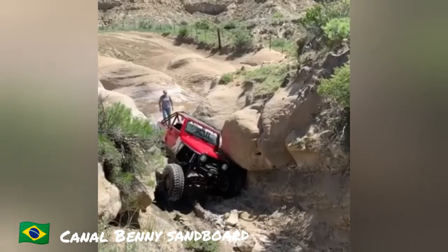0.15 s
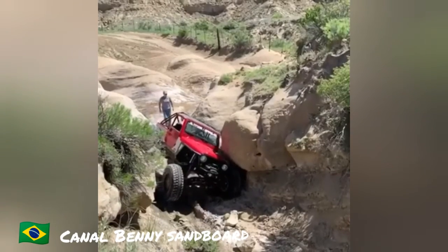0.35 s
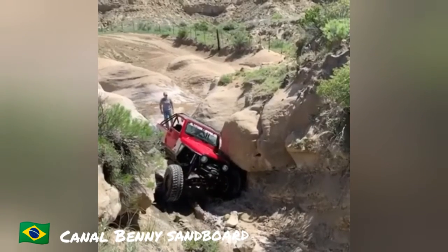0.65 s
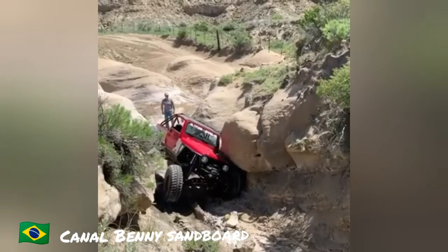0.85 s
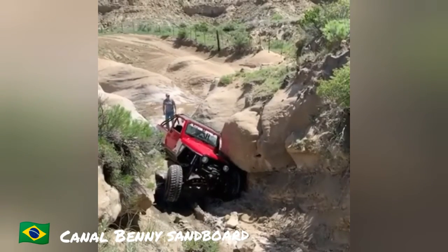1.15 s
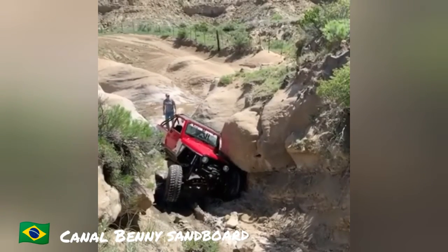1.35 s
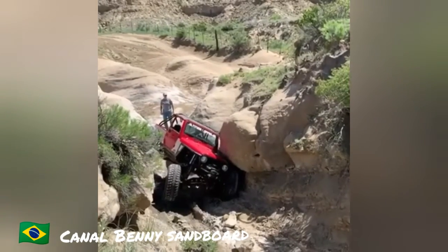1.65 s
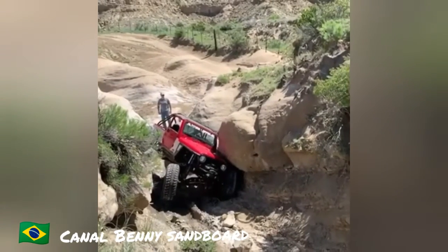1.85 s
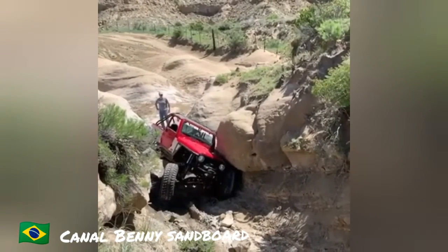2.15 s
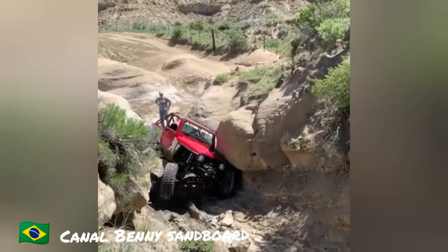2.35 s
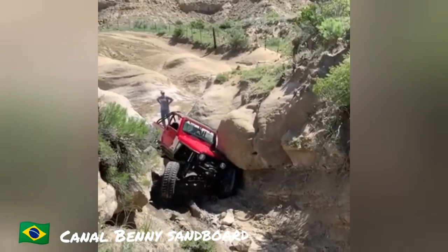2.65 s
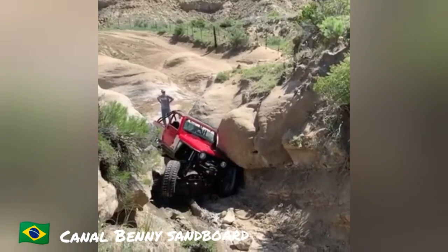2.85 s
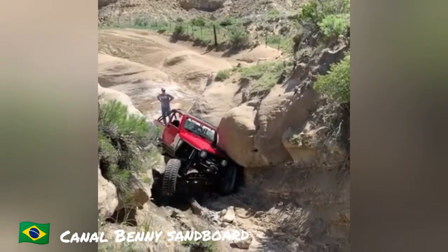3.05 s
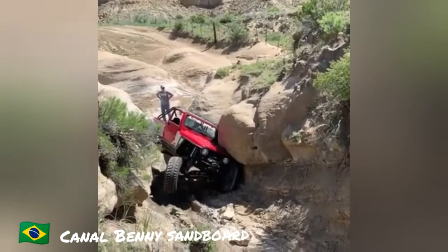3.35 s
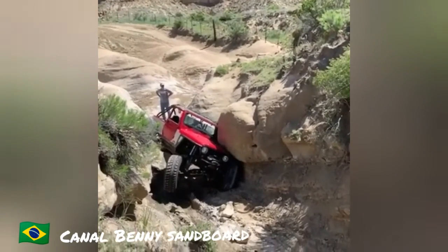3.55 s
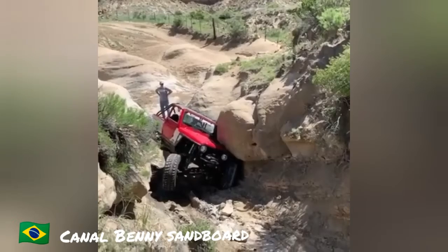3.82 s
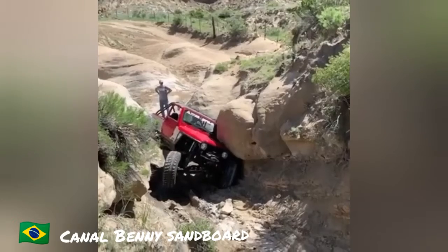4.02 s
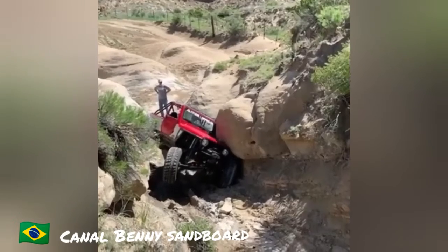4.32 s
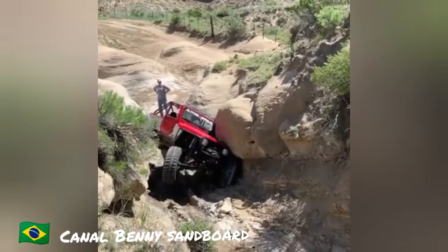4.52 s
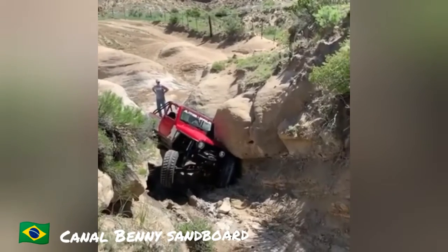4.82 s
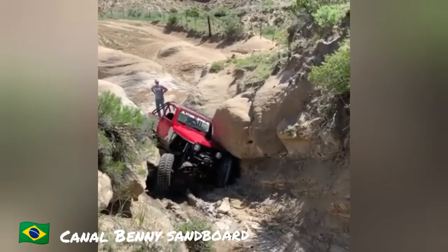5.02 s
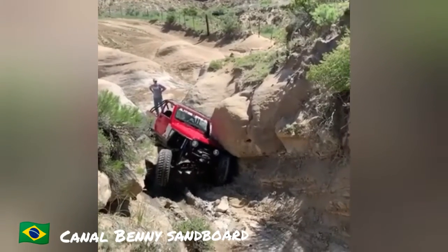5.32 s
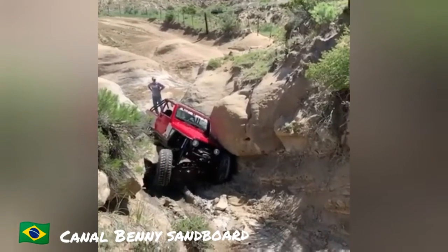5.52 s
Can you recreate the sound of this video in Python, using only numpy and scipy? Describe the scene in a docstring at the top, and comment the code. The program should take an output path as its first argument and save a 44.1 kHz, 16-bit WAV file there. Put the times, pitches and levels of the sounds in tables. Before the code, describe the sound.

A six-cylinder off-road vehicle works over a rock ledge outdoors, heard in mono from some metres away, dry and slightly band-limited. At 0 s the engine is already slowing, its exhaust a soft lumpy burble beneath mechanical rush and fan hiss. Short gritty tyre scuffs come at about 0.35-0.4 s and again at 0.5 s. The revs sag to their lowest near 1.2 s, then climb from 1.4 s into a fuller growl, holding a moderate pull around 2.5-3.5 s, with a quick scuff at 2.66 s. From 3.5 s the throttle opens wide and a loud, dense roar holds until about 4.6 s, with a faint whirr and drone. Then the foot lifts: the low exhaust swells, irregular pops run from 4.86 to 5.2 s, and deep body thumps land near 4.9 and 5.17 s. The pitch falls unsteadily, and a loose metal part ticks rapidly from 5.4 s until the end at roughly 5.7 s.

```python
"""A six-cylinder off-road engine on a rock ledge in the open air, heard from some metres away.
It sags towards idle while tyres scuff the rock, then pulls hard, with more scuffs, up to its top speed.
As the foot lifts, the exhaust swells and pops, the body thumps twice on its springs and a loose part rattles.
The exhaust sums multiples of one cylinder bank's firing rate over a growl of weaker multiples of the cycle;
shaped noise makes the engine bay, fan, scuffs and rattle, and decaying or bell-shaped levels place the events."""
import sys
import numpy as np
from scipy import signal
from scipy.fft import rfft, irfft, next_fast_len
from scipy.io import wavfile
from scipy.ndimage import uniform_filter1d, map_coordinates

SR = 44100
rng = np.random.default_rng(int(sys.argv[2]) if len(sys.argv) > 2 else 0)


def bounce(signal):
    """Save signal as a 16-bit WAV file at the path given by the first command-line argument."""
    frames = np.transpose(np.atleast_2d(signal))
    limited = np.clip(frames, -1, 1)
    pcm = np.round(limited * 32767).astype(np.int16)
    wavfile.write(sys.argv[1], SR, pcm)


N = 250399

TOP_RATE_HZ = 62  # bank rate to which the speed laws refer
FIRST_BLOW_TURNS = .45  # place of the blow within a bank turn (one period of the bank rate)


def amp(db):
    """Gain of a level in dB."""
    return 10 ** (np.asarray(db) / 20)


def unit(x):
    """x at rms 1."""
    return x / np.sqrt(np.mean(x ** 2) + 1e-20)


def along(points, hz):
    """Value at hz between (Hz, value) points on a log axis."""
    f, v = np.transpose(points)
    return np.interp(np.log(hz + 1), np.log(f + 1), v)


def curves(rows):
    """One value per sample for each column after the time."""
    s, *cols = np.transpose(rows)
    return [np.interp(np.arange(N) / SR, s, c) for c in cols]


def wobble(rate, step=1):
    """A smooth random curve, rate knots a second, one value every step samples."""
    knots = rng.standard_normal(int(N * rate / SR) + 4)
    return map_coordinates(knots, [np.arange(0, N, step) * rate / SR])


def filtered(x, response):
    """x times a response of frequency."""
    m = next_fast_len(len(x) + 8192)
    return irfft(rfft(x, m) * response(np.fft.rfftfreq(m, 1 / SR)), m)[:len(x)]


def patchy(depth_db):
    """Noise with patches of random gain in time and frequency."""
    z = signal.stft(rng.standard_normal(N), nperseg=512)[2]
    field = uniform_filter1d(rng.standard_normal(z.shape), size=5, axis=0)
    field = uniform_filter1d(field, size=8, axis=1)
    return signal.istft(z * amp(depth_db * unit(field)), nperseg=512)[1][:N]


def swell(s, length):
    """A bell-shaped rise and fall around s."""
    return np.exp(-.5 * ((np.arange(N) / SR - s) / (length / 2)) ** 2)


def humps(modes):
    """Gain of (Hz, width Hz, dB) resonances over a flat response."""
    return lambda hz: 1 + sum((amp(db) - 1) / (1 + ((hz - c) / (w / 2)) ** 2) for c, w, db in modes)


def ring(modes):
    """Response of (Hz, width Hz, dB) resonances that ring after a blow, with alternating sign."""
    return lambda f: sum((-1) ** k * amp(db) * 1j * f * w / (c * c - f * f + 1j * f * w)
                         for k, (c, w, db) in enumerate(modes))


def narrow(hz, width_hz, wander_hz):
    """Noise ringing in one resonance whose pitch wanders."""
    a, b = (filtered(rng.standard_normal(N), lambda f: 1 / (1 + (f / (width_hz / 2)) ** 2))
            for _ in range(2))
    phase = 2 * np.pi * np.cumsum(hz + wander_hz * wobble(7)) / SR
    return unit(a * np.cos(phase) + b * np.sin(phase))


def follows(law, bank_hz, throttle_db):
    """A level in dB that follows speed and throttle."""
    top_db, per_octave_db, share = law
    return top_db + per_octave_db * np.log2(bank_hz / TOP_RATE_HZ) + share * throttle_db


def engine_bay(turns, rush_db, hiss_db):
    """Mechanical rush throbbing with each firing and ringing in panels, fan hiss, a whirr and a pulsing drone."""
    # spectra of the mechanical rush and the fan: (frequency [Hz], relative level per Hz [dB])
    rush_spectrum = [(180, -6), (300, -8.5), (380, -20.5), (460, -10), (660, -12), (760, -7.5), (910, -14),
                     (1940, -9.5), (3000, -34.5), (3900, -38), (6600, -120)]
    fan_spectrum = [(1180, -50), (2000, -5.5), (2510, -12), (3060, -9), (3650, -5.5), (4760, -17.5),
                    (6110, -12), (7230, -16), (8350, -12), (9940, -26.5), (11200, -17.5), (11900, -26.5),
                    (12300, -56), (16000, -78), (22000, -120)]
    # sheet metal round the engine: (frequency [Hz], width [Hz], gain [dB])
    panel_modes = [(453, 58, 5), (1087, 46, 3), (1872, 890, -9)]
    # whirr and drone resonances: (frequency [Hz], width [Hz], wander [Hz])
    whirr_mode = (1920, 45, 10)
    drone_mode = (752, 100, 10)
    # their levels at the microphone: (time [s], level [dB])
    whirr_curve = [(0, -75), (1.7, -62), (2.1, -50.5), (3.55, -47.5), (3.72, -42.5), (3.9, -49),
                   (4.15, -51.5), (4.35, -37.5), (4.52, -45), (4.62, -41.5), (4.78, -44), (4.92, -50),
                   (5.68, -50)]
    drone_curve = [(0, -45), (.63, -38), (1.6, -39), (2.3, -36.5), (3.5, -39), (4.1, -46.5), (4.42, -35),
                   (4.74, -41), (5.06, -42), (5.68, -40.5)]

    throb = 1 + np.cos(2 * 2 * np.pi * turns)  # two firings a bank turn
    rush = filtered(patchy(1.4) * (1 + 0.05 * throb),
                    lambda hz: amp(along(rush_spectrum, hz)) * humps(panel_modes)(hz))
    hiss = filtered(patchy(2.87) * (1 + 0.032 * throb), lambda hz: amp(along(fan_spectrum, hz)))
    flutter = wobble(9)  # shared by rush and hiss
    rush = amp(rush_db + 0.54 * flutter) * unit(rush)
    hiss = amp(hiss_db + 0.87 * flutter + 0.31 * wobble(14)) * unit(hiss)

    whirr_gain = amp(curves(whirr_curve)[0] + 1.4 * wobble(13))
    whirr = whirr_gain * (1 + 0.46 * throb) / 1.46 * narrow(*whirr_mode)
    drone_gain = amp(curves(drone_curve)[0] + 0.46 * wobble(15))
    drone = drone_gain * (1 + 0.22 * np.cos(2 * np.pi * turns)) * narrow(*drone_mode)
    return rush + hiss + whirr + drone


def rattle():
    """A loose metal part ticks: each tick is a short gritty burst coloured by the part's broad modes."""
    # ticks: (time [s], relative level [dB])
    ticks = [(5.424, -38), (5.449, -37), (5.474, -46), (5.4991, -33), (5.5236, -35), (5.5475, -30),
             (5.57, -29), (5.5914, -34), (5.6108, -32), (5.631, -30), (5.65, -38)]
    # modes of the part: (frequency [Hz], width [Hz], gain [dB])
    part_modes = [(3800, 600, 9), (4930, 750, 15), (5830, 790, 13.5), (6700, 700, 10)]
    out, t = np.zeros(N + SR), np.arange(SR // 20) / SR
    for s, db in ticks:
        decay = amp(db - 60 * t / .024)  # 60 dB in 24 ms
        attack = 1 - np.exp(-t / .001)
        out[round(s * SR):][:len(t)] += decay * attack * rng.standard_normal(len(t))
    return amp(-8) * filtered(out[:N], lambda hz: humps(part_modes)(hz) - 1)  # modes alone, no flat part


def tyres():
    """Rubber slips on rock in gritty bursts; the body drops on its springs with a low thump."""
    # scuffs: (time of peak [s], length [s], rms level [dB], centre [Hz], half width [octaves])
    scuffs = [(0.348, 0.033, -33, 1000, 1.64), (0.362, 0.018, -26, 1000, 1.2),
              (0.387, 0.025, -24, 990, 1.44), (0.406, 0.03, -35, 800, 0.76),
              (0.494, 0.019, -32.5, 1300, 1.53), (0.51, 0.023, -29.5, 1040, 1.15),
              (2.662, 0.0068, -25.5, 760, 0.95), (4.337, 0.019, -41, 7150, 0.43),
              (4.383, 0.1, -47.5, 7150, 0.42), (4.873, 0.012, -41, 3500, 0.3)]
    # suspension thumps: (time of peak [s], length [s], rms level [dB], frequency [Hz])
    thumps = [(4.918, .045, -20, 44), (5.165, 0.11, -25, 58.8)]
    # tyre resonances: (frequency [Hz], width [Hz], gain [dB])
    tread_modes = [(574, 100, 13), (870, 34, 14), (1320, 72, 4.5), (1560, 110, 6), (2140, 120, 6.5),
                   (2680, 54, 1)]
    out = np.zeros(N)
    for s, length, db, hz, octaves in scuffs:
        grit = rng.standard_normal(N) * amp(2.4 * wobble(400))
        band = filtered(grit, lambda f: np.exp(-(np.log2((f + 1) / hz) / octaves) ** 4)
                        * humps(tread_modes)(f))
        bell = swell(s, length)
        level = amp(db) * np.linalg.norm(bell) / np.linalg.norm(bell * band)
        out += level * bell * band
    for s, length, db, hz in thumps:
        out += amp(db) * np.sqrt(2) * swell(s, length) * np.sin(2 * np.pi * hz * (np.arange(N) / SR - s))
    return out


def pops():
    """Late firings pop in the pipe off the throttle: one short suck between two weaker pushes."""
    # pops: (time [s], peak level [dB])
    late_firings = [(4.861, -14), (4.943, -9), (4.96, -15), (4.993, -15), (5.01, -13), (5.043, -14),
                    (5.132, -15), (5.149, -15), (5.203, -17)]
    half_width_s = .0016
    out = np.zeros(N)
    for s, db in late_firings:
        v = (np.arange(N) / SR - s) / half_width_s
        out += amp(db) * (v ** 2 - 1) * np.exp(-v ** 2 / 2)
    return out


def lead(bank_hz):
    """Turns by which exhaust waves lead the blow: the shape turns over at speed and swings near a pipe notch."""
    return .52 * (bank_hz / TOP_RATE_HZ) ** 6 - .1 - .5 * np.exp(-((bank_hz - 38.5) / 3) ** 2)


def growl_lines(bank_hz, chug_db, odd_db):
    """Cylinders differ, so weak multiples of the whole cycle (a third of the bank rate) sound through the pipe."""
    # exhaust pipe: (frequency [Hz], relative level [dB])
    pipe = [(15, -47), (35, -9.5), (60, -18), (110, -2), (160, -6.5), (195, 13.5), (215, -2), (235, 8),
            (262, -2), (280, -3.5), (300, 1), (335, 1.5), (360, -11), (380, -8), (450, -5), (560, -3),
            (800, -55)]
    # strength of the weak multiples, lowest first: (relative level [dB])
    uneven_db = [-8, 0.5, -13, -3, 5, -1, -3.5, -0.5, -4.5, 1.5, 0, 3, 2, 2.5, -4, 1.5, 2.5, 1.5, -2, -5,
                 -8, 2.5, -8, -6]
    high_db = -3  # all weak multiples above those

    step = 16  # samples; the lines are low enough for a coarse rate
    cycle_hz = bank_hz[::step] / 3
    cycles = (np.cumsum(bank_hz) / SR - FIRST_BLOW_TURNS)[::step] / 3
    weak = [k for k in range(1, 55) if k % 3 or k > 18]  # the others are the strong exhaust lines
    sway_db, sway_turns = 2.5 - cycle_hz / 18, .0015  # level is steadier at speed
    # at speed the echoes of the pipe overlap the next blows, so the phases scatter more; at low speed they stay
    # closer in step
    scatter_turns = .13 + .25 / (1 + np.exp((14 - cycle_hz) / .5))
    growl = 0
    for k, db in zip(weak, uneven_db + [high_db] * len(weak)):
        level_db = along(pipe, k * cycle_hz) + db
        level_db = level_db + (k % 3 == 0) * chug_db[::step] + (k % 2) * odd_db[::step]
        level_db = level_db - .48 * k  # a blow lasts a fixed crank angle, so high multiples are weak
        smear = sway_turns * (k + k * k / 40) * wobble(12, step)  # high multiples smear more
        phase = k * cycles + lead(bank_hz[::step]) + scatter_turns * rng.standard_normal() + smear
        growl = growl + amp(level_db + sway_db * wobble(5.7, step)) * np.cos(2 * np.pi * phase)
    return unit(signal.resample_poly(growl, step, 1)[:N])


def stumbles(bank_hz):
    """Each single firing is a little stronger or weaker by chance and rings in the muffler."""
    # gas flow: (frequency [Hz], relative level per Hz [dB])
    flow = [(10, -30), (25, 5), (60, 5.5), (120, 13), (240, 5.5), (270, -15), (335, -12), (400, -31),
            (700, -55)]
    # muffler resonances: (frequency [Hz], width [Hz], gain [dB])
    muffler_modes = [(56.4, 42, -3), (107, 32, -5), (186.5, 40, -4.5), (235.5, 8, 4.5), (336, 27, 9.5)]
    firing = np.diff(np.floor(2 * np.cumsum(bank_hz) / SR), prepend=0)
    chance = firing * rng.uniform(-1.03, 1, N) * amp(2.1 * wobble(7)) / np.sqrt(bank_hz)
    return unit(filtered(chance, lambda hz: amp(along(flow, hz)) * ring(muffler_modes)(hz)))


def burble(bank_hz, chug_db, odd_db):
    """The uneven growl of the cylinders plus the chance part of the firings, each on its own level curve."""
    # levels at the microphone: (time [s], level [dB])
    growl_curve = [(0, -36.5), (1.9, -29), (2.2, -24.5), (2.6, -24), (3.2, -27.5), (4.1, -21),
                   (4.45, -20.5), (5.1, -26), (5.68, -29)]
    stumble_curve = [(0, -30), (.8, -35), (1.5, -35), (2.3, -31), (3.0, -30), (3.7, -30), (4.0, -32),
                     (4.55, -31), (4.75, -27.5), (5.1, -25.5), (5.4, -27), (5.68, -26)]
    growl = amp(curves(growl_curve)[0]) * growl_lines(bank_hz, chug_db, odd_db)
    return growl + amp(curves(stumble_curve)[0]) * stumbles(bank_hz)


def line_levels(bank_hz, throttle_db):
    """Level of multiples 1 to 6: from 2 up, each slides through the peaks and notches of its exhaust path."""
    # path of even multiples, where the banks add up: (frequency [Hz], rms level [dB])
    both_banks = [(35, -1.5), (70, -7), (75, -11), (80, -22), (86, -12), (92, -6), (113, -11.5),
                  (128, -10.5), (141, -20.5), (158, -7), (174, -13), (186, -1.5), (203, -5), (219, -25.5),
                  (232, -26.5), (258, -22), (278, -24), (325, -19.5), (345, -31), (366, -47), (390, -31)]
    # path of odd multiples, where the banks partly cancel: (frequency [Hz], rms level [dB])
    one_bank = [(54, -25), (64, -20), (72, -45), (80, -17), (92, -12), (115, -14.5), (140, -18), (162, -37),
                (182, -20.5), (196, -20), (220, -37), (236, -26), (262, -31), (278, -23), (325, -29)]
    # strong lines: (multiple of the bank rate, added level [dB], share of the throttle it follows)
    multiples = [(2, 1.28, 1), (3, -0.94, 0.61), (4, 0.04, 0.89), (5, -9, 0.25), (6, -9, 0.7)]
    lope_db, lift_db = -38.5, -28  # the bank rate itself, and its swell when the foot lifts
    lift_s, rise_s, hold_s, fall_s = 4.6, .05, .26, .3

    lift = np.interp(np.arange(N) / SR, np.cumsum([lift_s, rise_s, hold_s, fall_s]), [0, 1, 1, 0])
    lope = amp(lope_db + 2.5 * wobble(5.16)) + amp(lift_db) * lift
    levels_db = [20 * np.log10(lope)]
    for k, db, share in multiples:
        path = one_bank if round(k) % 2 else both_banks
        levels_db.append(along(path, round(k) * bank_hz) + db + share * throttle_db)
    return levels_db


def exhaust(bank_hz, levels_db):
    """Multiples of the bank rate add up to thumps whose shape turns over with speed, unsteadier off the throttle."""
    odd_turn_hz = 36  # bank rate where the odd path swings into step
    turns = np.cumsum(bank_hz) / SR - FIRST_BLOW_TURNS
    overrun = np.clip((-np.gradient(bank_hz) * SR - 9) / 12, 0, 1)  # 0 to 1 as the rate falls 9 to 21 Hz/s
    sway_db, sway_turns = .4 + 1.3 * overrun, .012 + .022 * overrun
    lead_turns = lead(bank_hz) + .2 * overrun
    odd_turns = .035 - .22 / (1 + np.exp(bank_hz - odd_turn_hz))  # odd multiples come by their own path
    drift_turns = .025  # the multiples slide slowly in and out of step
    out = 0
    for k, db in enumerate(levels_db, 1):
        gain = np.sqrt(2) * amp(db + sway_db * wobble(14))
        phase = k * turns + lead_turns + k % 2 * odd_turns
        phase = phase + drift_turns * wobble(1.36) + sway_turns * wobble(12)
        out = out + gain * np.cos(2 * np.pi * phase)
    return out


def scene():
    """All sources in the open air, driven by one speed curve and one throttle curve."""
    # engine speed: (time [s], firing rate of one cylinder bank [Hz])
    speed = [(0, 33.2), (.16, 30.4), (.44, 28.2), (.99, 21), (1.1, 19), (1.21, 18.1), (1.43, 21.4),
             (1.54, 25.4), (1.9, 34.9), (2.2, 39.2), (2.53, 43.5), (3.0, 48.7), (3.41, 50), (3.52, 51.3),
             (3.83, 59.4), (4.1, 61.4), (4.3, 62.1), (4.53, 62.4), (4.63, 65), (4.75, 64.2), (5.17, 56),
             (5.61, 46.6), (5.68, 46)]
    # strength of the exhaust blows, 0 = wide open: (time [s], level [dB])
    throttle = [(0, -16.5), (0.15, -20), (1.25, -21), (1.45, -18.5), (1.9, -9), (2.75, -12.5), (3.5, -11.5),
                (3.7, 0), (4.58, 0), (4.7, -9), (5.2, -11), (5.68, -24.5)]
    # laws: (level at top rate and open throttle [dB], slope [dB per octave of speed], share of the throttle)
    chug_law = (-4.5, 0.1, -0.74)  # whole firings in the growl
    odd_law = (-5.5, 0.1, -0.37)  # odd multiples of the cycle sink as the throttle opens
    rush_law = (-30, 1.65, 0.035)
    hiss_law = (-44, 4.2, 0.011)

    bank_hz = uniform_filter1d(curves(speed)[0], size=SR // 20)  # the flywheel rounds off changes of speed
    throttle_db, = curves(throttle)
    chug_db, odd_db, rush_db, hiss_db = (follows(law, bank_hz, throttle_db)
                                         for law in (chug_law, odd_law, rush_law, hiss_law))
    bay = engine_bay(np.cumsum(bank_hz) / SR, rush_db, hiss_db)
    pipe_sound = burble(bank_hz, chug_db, odd_db) + exhaust(bank_hz, line_levels(bank_hz, throttle_db))
    return (bay + rattle() + tyres() + pops() + pipe_sound)[None]


def record(dry):
    """The microphone channel keeps nothing above its band limit."""
    top_hz = 11950
    return filtered(dry[0], lambda hz: hz < top_hz)[None]


dry = scene()
out = record(dry)
bounce(out)
```